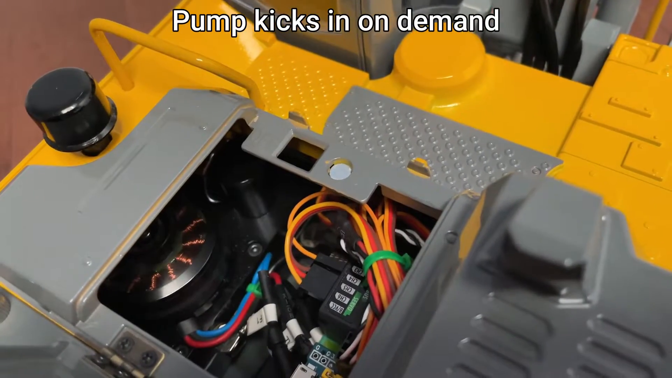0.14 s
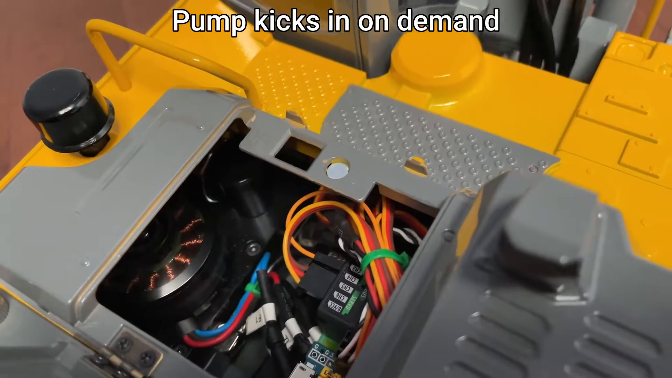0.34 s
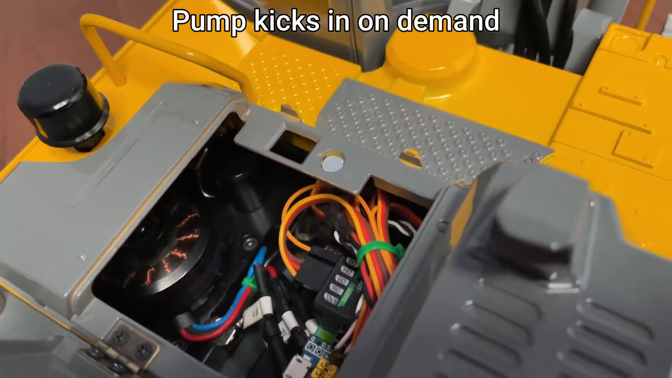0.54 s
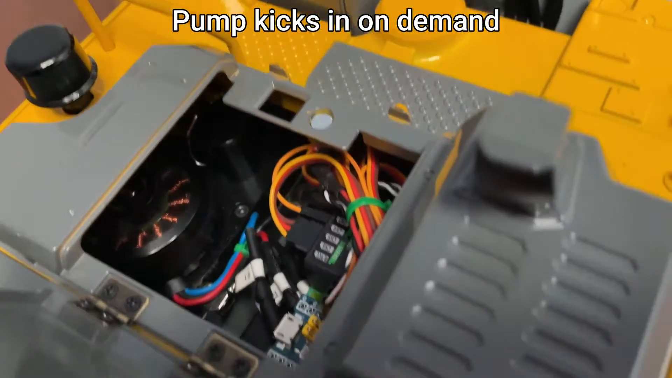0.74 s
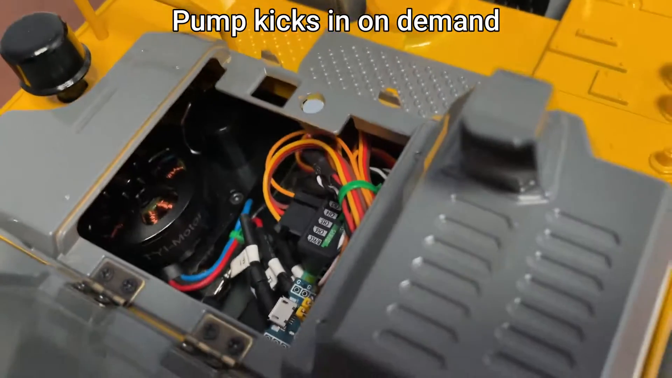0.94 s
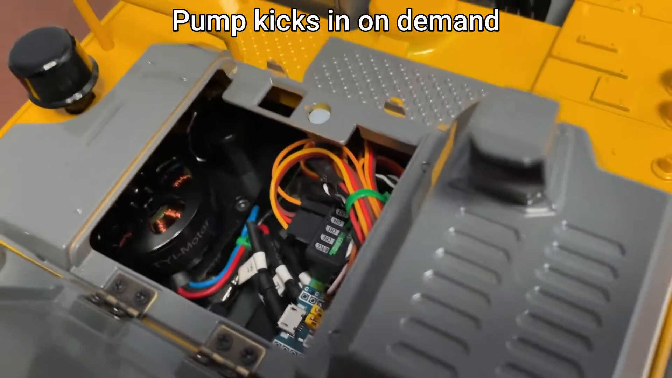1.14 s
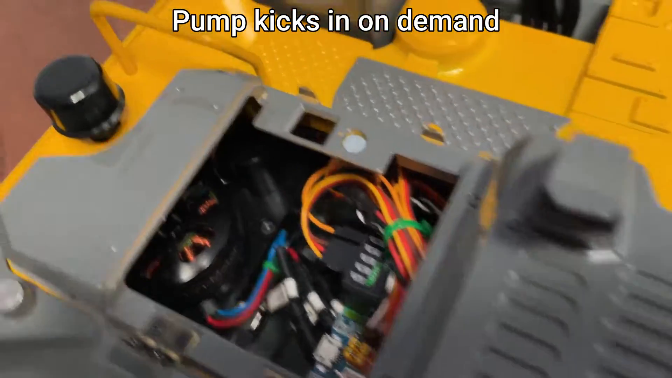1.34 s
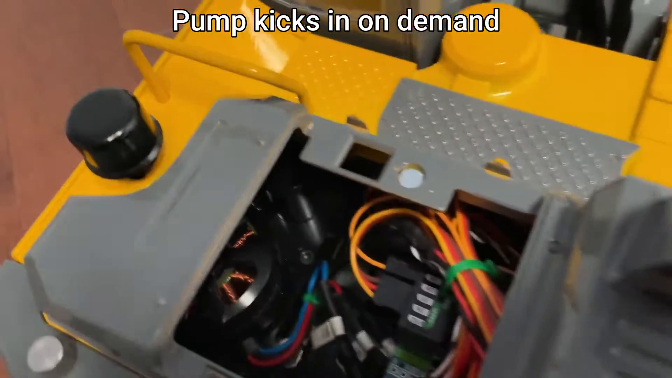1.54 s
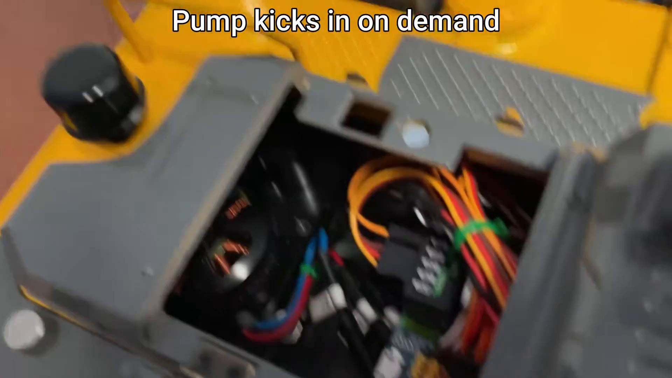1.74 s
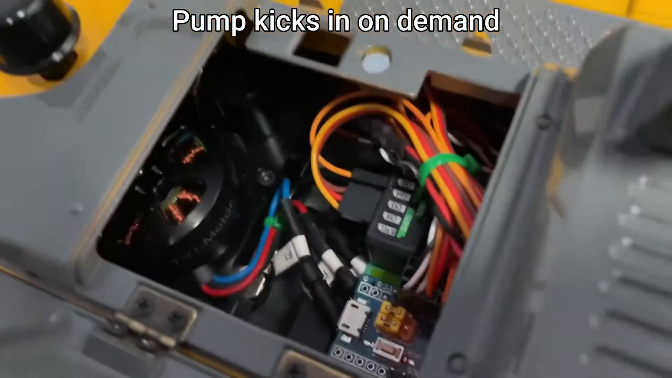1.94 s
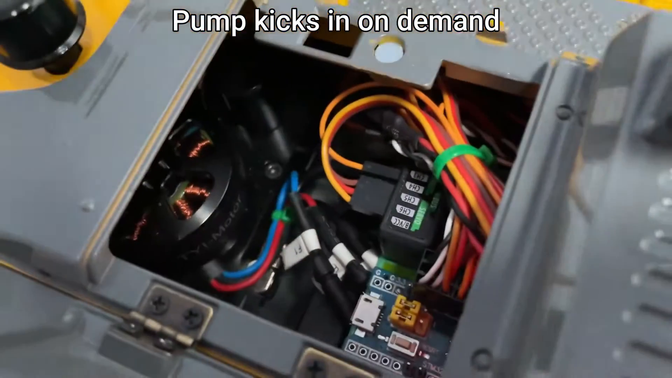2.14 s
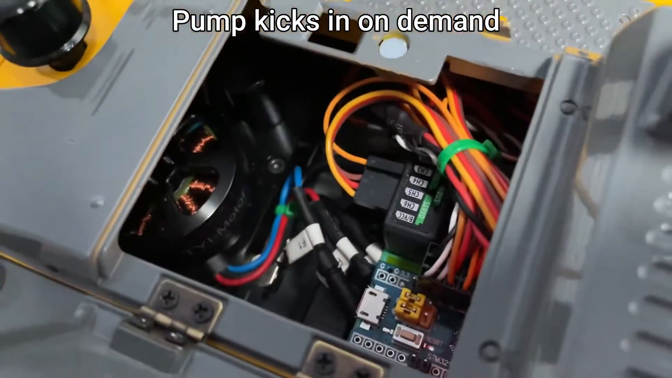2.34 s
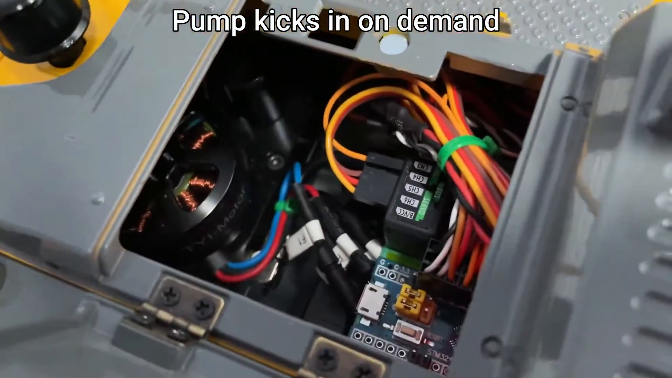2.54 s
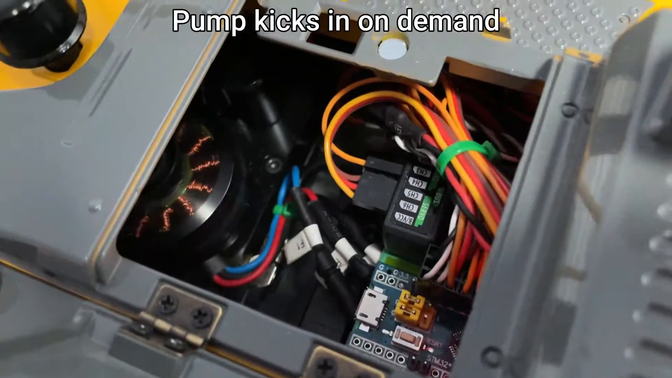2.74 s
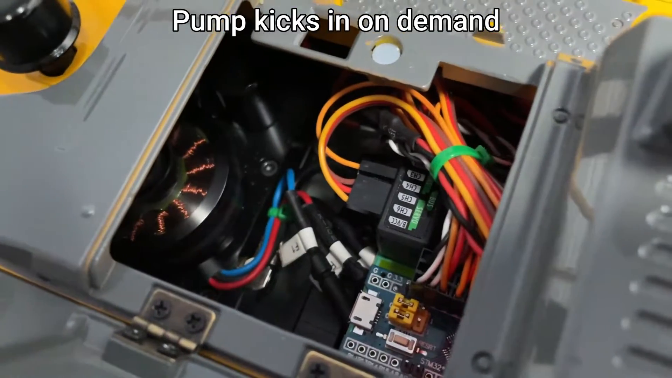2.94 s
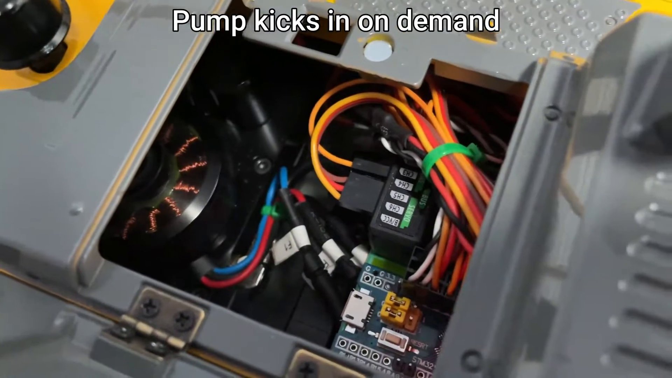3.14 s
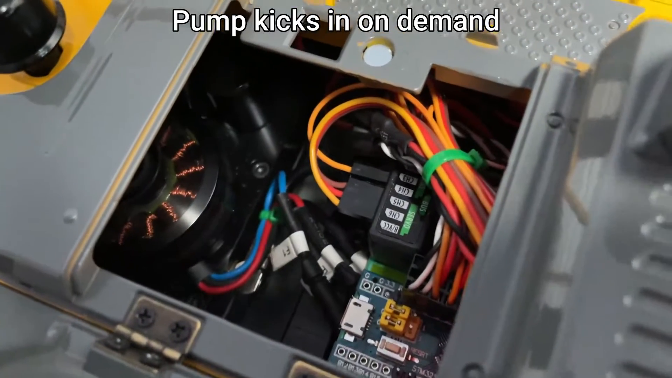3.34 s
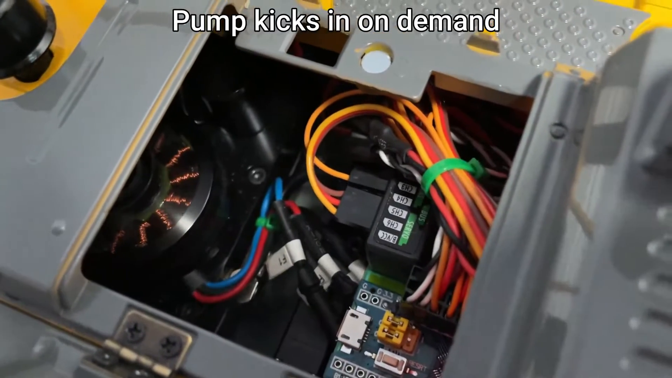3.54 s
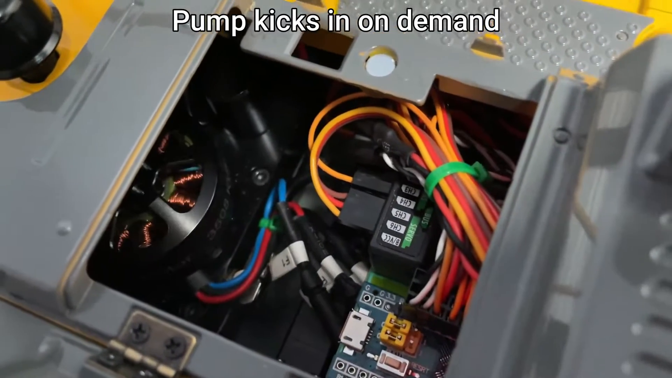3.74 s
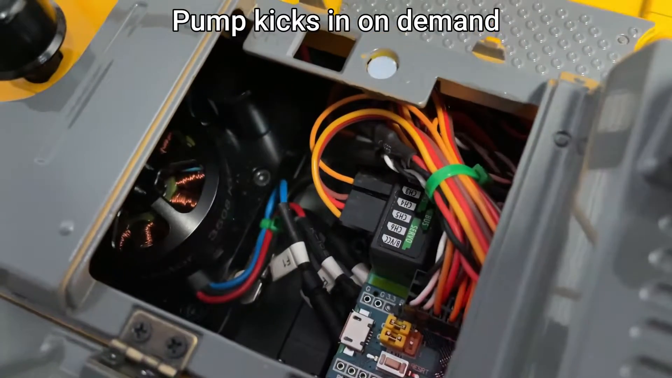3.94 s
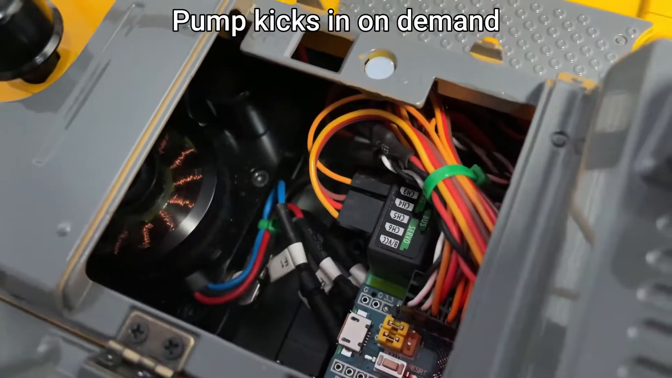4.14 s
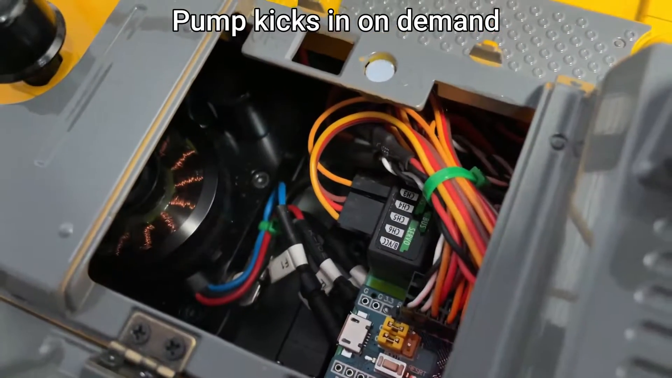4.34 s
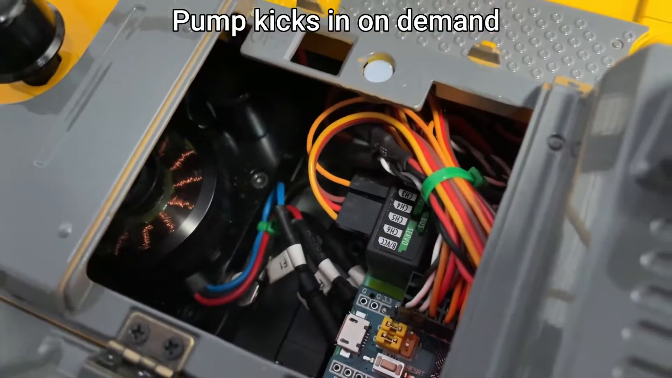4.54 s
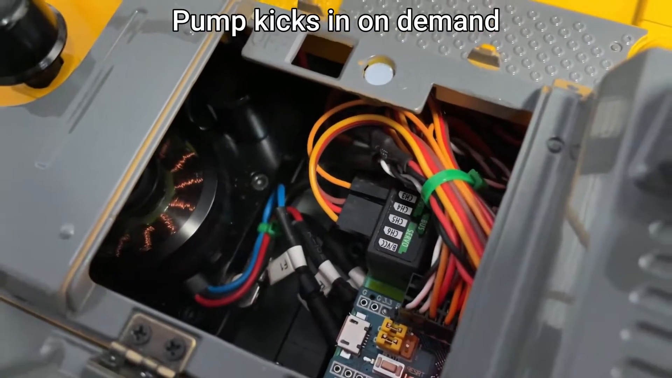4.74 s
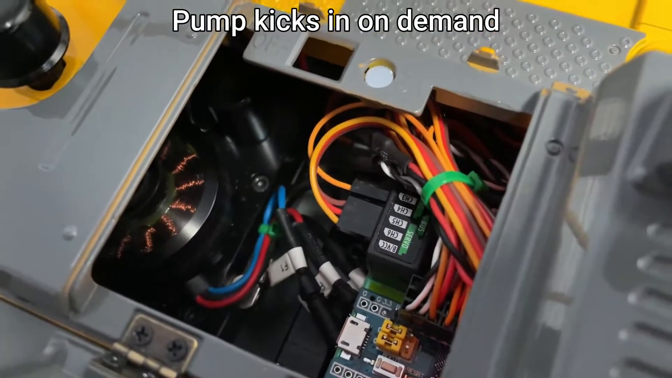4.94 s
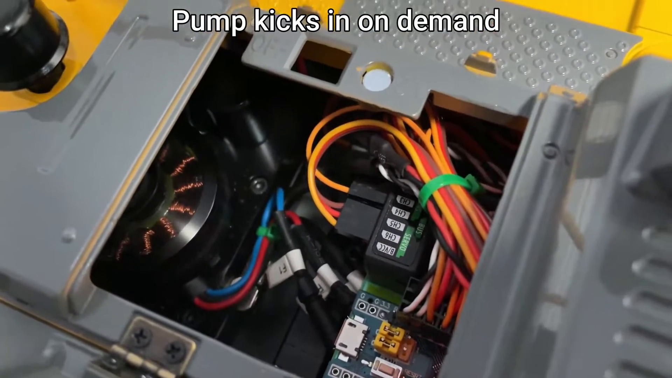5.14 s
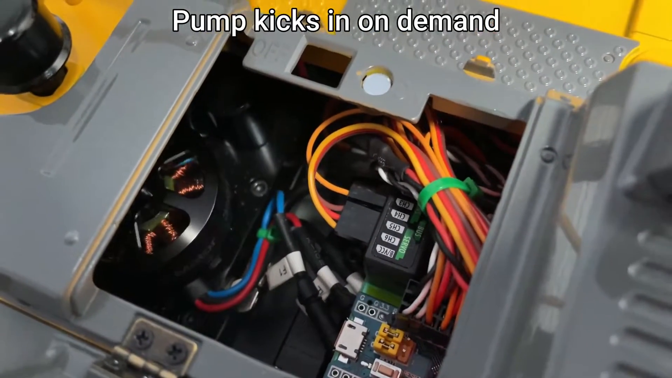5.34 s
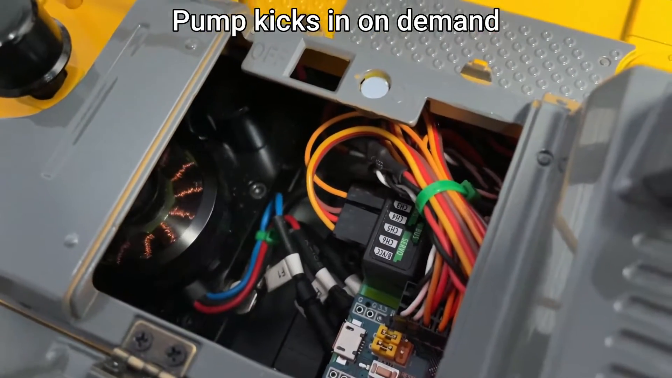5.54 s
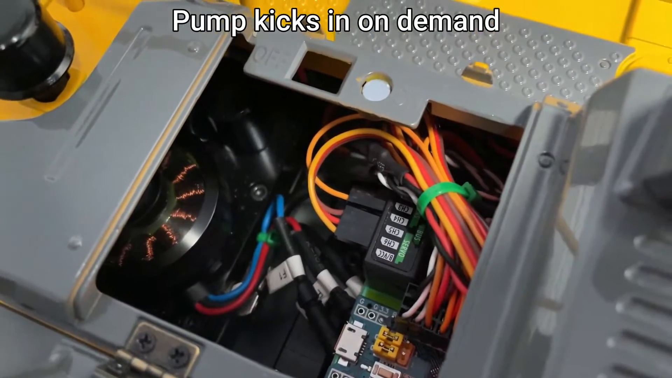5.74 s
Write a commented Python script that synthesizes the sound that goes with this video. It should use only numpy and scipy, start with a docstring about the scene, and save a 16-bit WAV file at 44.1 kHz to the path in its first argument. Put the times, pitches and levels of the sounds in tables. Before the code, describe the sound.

A close, dry, centred indoor sound of miniature machinery: gritty metallic pump whirr with plasticky body rattle, running in four bursts. Between them a small fan whines steadily over soft air noise. Short servo hisses, ticking metal knocks and soft low thumps mark the stops and starts. The third burst is the most strained, singing at a high pitch before dropping off; the last is cut while running. The microphone moves closer early on.

```python
"""Inside a scale-model excavator

A pump drive runs four times, under way at the start and at the end: noisy tooth contacts ring steel and
plastic modes, and shaft overtones whine under load. Servos hiss in short moves, and one creeps with a
chopped buzz. Short noise blows knock, and sagging low sines thump as the chassis rocks. Behind it all
a small fan whines: sine orders over coloured air noise and a low room rumble."""
import sys
import numpy as np
from scipy import signal
from scipy.fft import rfft, irfft, next_fast_len
from scipy.io import wavfile
from scipy.ndimage import uniform_filter1d, map_coordinates

SR = 44100
rng = np.random.default_rng(int(sys.argv[2]) if len(sys.argv) > 2 else 0)


def bounce(signal):
    """Save signal as a 16-bit WAV file at the path given by the first command-line argument."""
    frames = np.transpose(np.atleast_2d(signal))
    limited = np.clip(frames, -1, 1)
    pcm = np.round(limited * 32767).astype(np.int16)
    wavfile.write(sys.argv[1], SR, pcm)


N = 255006

# Levels within a table are relative unless its comment says otherwise.
# Pump runs: start t/s, stop t/s, starting surge level/dB before each part's own scaling
PUMP_RUNS = [(-.1, .811, 0), (2.724, 3.572, 10), (4.071, 5.25, 7), (5.523, 5.9, 7)]
# Oil pressure on the pump: t/s, level/dB
OIL_LOAD = [(0, -1), (.8, 0), (2.84, -5), (2.92, -1), (3.4, .4), (3.58, 0), (4.1, -2.5), (4.45, .8),
            (4.6, 4.5), (4.78, 7), (5.05, 5), (5.14, 3.5), (5.18, -2.5), (5.3, -4), (5.62, -4), (5.73, 3)]
# Pump shaft speed before its jitter: t/s, f/Hz (turns a second)
SHAFT_SPEED = [(0, 155), (.85, 175), (2.75, 200), (2.95, 158), (3.6, 170), (4.2, 146), (4.42, 212),
               (4.59, 228), (4.65, 268), (4.74, 290), (4.79, 297), (5.08, 295.6), (5.125, 279), (5.3, 260),
               (5.5, 165)]
# The microphone moves in: t/s, level/dB
NEARNESS = [(0, -4), (.9, -2), (1.1, -4), (1.45, -2), (1.9, 0), (3.7, 1), (5.78, 2)]
# Pump parts by name: base level/dB, dB per dB of load, of nearness, of surge,
# spin-up time constant/s, surge fade time constant/s, run-out t60/s
PUMP_PARTS = dict(ring=(-28.5, 1.1, .2, 1.3, .002, .03, .1), bracket=(-27, .95, 1.7, 1.2, .004, .03, .25),
              bell=(-22.3, .42, -.1, .7, .002, .015, .05), drum=(-32.5, 1.05, -.1, 1.9, .045, .1, .25),
              rasp=(-31, 1.25, .1, 1.5, .012, .09, .15), hiss=(-28, .5, .5, .7, .015, .15, .2),
              hum=(-56, .7, .9, .1, .02, .05, .5))
# Steel housing modes: f/Hz, width/Hz, level/dB
HOUSING_MODES = [(2835, 30, -15), (3452, 55, 0), (3965, 85, -2)]
# Bracket modes: f/Hz, width/Hz, level/dB
BRACKET_MODES = [(3622, 55, 0), (3740, 70, -9)]
# Modes of the motor's spinning cup: f/Hz, width/Hz, level/dB
BELL_MODES = [(5068, 40, 0), (4985, 80, -14)]
# Plastic body panel modes: f/Hz, width/Hz, level/dB
PANEL_MODES = [(488, 26, -19), (573.6, 42.7, 6), (724, 24, -1.5), (807, 51, 3), (888, 37, -9)]
# Boom of the frame: f/Hz, width/Hz, level/dB
CHASSIS_MODES = [(225, 70, 10)]
# Spectrum of the pump's rasp: f/Hz, level/dB per Hz
RASP_SPECTRUM = [(25, -50), (70, -30), (230, -22), (330, -40), (433, -14.5), (583, -2), (724, -0.5),
                 (824, -5.5), (1020, -10.5), (2030, -6), (2170, -3.5), (2500, -12), (3200, -10),
                 (4160, -33), (7040, -120)]
# Valve block modes: f/Hz, width/Hz, level/dB
VALVE_MODES = [(4430, 1500, -22.5), (5620, 120, -19), (7080, 120, -9), (7650, 150, -12), (8250, 180, -13),
               (8900, 400, -12), (9970, 390, -14), (10600, 310, -12.5), (11760, 200, -12.5),
               (12800, 220, 2.5), (13750, 250, -4), (14100, 220, -.6), (14750, 310, -5), (15560, 220, 5)]
# Whine overtones: multiple of shaft speed, level/dB on top of the whine level
WHINE_OVERTONES = [(4, -6.5), (5, -10), (6, -8.5), (7, -1)]
# Servo moves: start t/s (18 dB below full), length/s, full level/dB, rise/s per 18 dB, sag level/dB, servo
SERVO_MOVES = [(.72, .09, -30, .03, 3, "near"), (.81, .085, -22, .03, .5, "near"),
               (2.73, .2, -30, .005, 12, "far"), (3.5, .07, -34, .04, .5, "far"),
               (3.575, .145, -22.5, .008, 2, "far"), (3.885, .085, -21, .04, 1.5, "far"),
               (3.98, .07, -27, .015, 5, "far"), (4.066, .015, -23, .008, .5, "far"),
               (5.14, .08, -27, .03, .5, "near"), (5.225, .14, -21, .02, 4, "near"),
               (5.4, .12, -18.5, .04, 7, "near"), (5.525, .045, -22.5, .015, 2.1, "near")]
# Case modes of the near servo: f/Hz, width/Hz, level/dB
NEAR_CASE_MODES = [(2794, 150, -1.5), (3350, 83, -1), (4020, 1400, -11), (5350, 280, -.6),
                   (5830, 150, -1.5), (7710, 300, -8), (8900, 300, -2.5), (9350, 270, 2.5),
                   (10630, 190, -12), (11650, 400, 2), (12800, 300, -8), (13400, 400, -16),
                   (14400, 300, -5), (15150, 300, -1)]
# Case modes of the far servo: f/Hz, width/Hz, level/dB
FAR_CASE_MODES = [(3190, 590, -5), (4000, 350, -.4), (4700, 270, -3), (5390, 220, 2.5), (5850, 200, 1.2),
                  (6670, 300, -10.5), (7600, 220, -4), (8400, 260, -1), (8930, 440, -4), (9640, 550, -8),
                  (11050, 590, -5), (11950, 300, 1.5), (13000, 300, -6), (13700, 320, -5),
                  (14700, 500, -1.5)]
# Servo creeping against load: t/s, gear level/dB, buzz level/dB, before twitches and chopping
CREEP_LEVELS = [(2.21, -51, -57), (2.3, -47, -49), (2.49, -45, -47), (2.53, -41, -41), (2.724, -39, -39)]
# Twitches of that servo: t/s, level/dB over the strain, half width/s
CREEP_TWITCHES = [(2.222, 6, .008), (2.39, 14, .022), (2.612, 8, .014)]
# Gear modes of the creeping servo: f/Hz, width/Hz, level/dB
CREEP_GEAR_MODES = [(5600, 760, 0), (8600, 360, -2), (9050, 330, -1), (9800, 330, -6)]
# Buzz modes of the creeping servo: f/Hz, width/Hz, level/dB
CREEP_BUZZ_MODES = [(11500, 250, -2), (12200, 250, -1), (12850, 300, -1), (13600, 300, -6),
                    (14900, 500, -2), (15400, 150, -6)]
# Slack taken up: t/s, rattle level/dB into the modes, dull level/dB and crack level/dB relative to the rattle
SLACK_KNOCKS = [(0.8006, 2, -30, -28), (2.7252, 1, -13, -24), (2.7414, 1.5, -23, -22),
                (4.0587, .4, -14, -24), (4.0721, 6, -32, -23), (5.243, 3, -34, -24),
                (5.5233, 1.5, -24, -27)]
# Chassis jolts: t/s, level/dB before make-up gain, settled f/Hz, t60/s, pitch excess at the start (fraction)
CHASSIS_JOLTS = [(.838, -36, 130, 0.21, 0.57), (1.521, -41.5, 95, 0.15, 2.1), (2.748, -30, 100, 0.16, .3),
                 (4.07, -34.5, 96, 0.25, .5), (5.544, -38, 110, 0.17, 0.54), (5.738, -32, 85, 0.094, .6)]
# Faint fan lines that follow the air level: multiple of fan speed, level/dB
FAINT_FAN_LINES = [(1, -65), (3, -59), (4, -57), (5, -52), (8, -47), (10, -44.5), (15, -51.5), (16, -53),
                   (27, -78), (28, -86), (35, -48), (40, -56), (45, -69)]
# Loud fan lines: multiple of fan speed, level/dB, dB per dB of nearness,
# t/s when the microphone passes the loud spot, level/dB gained there
LOUD_FAN_LINES = [(20, -36, .5, 1.8, .6), (24, -41, 1.5, 1.9, 2.1), (25, -41, 2.1, 2.2, 4),
                  (30, -41, .1, 1.6, 4.5)]
# Spectrum of the fan's air rush: f/Hz, level/dB per Hz
AIR_SPECTRUM = [(180, -42), (300, -22.5), (510, -15.5), (680, -9.5), (852, -12.5), (1210, -8.5), (1680, 0),
                (3050, -11.5), (3480, -2.5), (3780, -6.5), (4170, -2), (5260, -4.5), (5530, -8.5),
                (11100, -26), (15700, -38)]
# Spectrum of the low room rumble: f/Hz, level/dB per Hz
ROOM_SPECTRUM = [(15, -63), (25, -25), (75, 6), (177, -7.5), (236, -0.5), (348, -21), (375, -71),
                 (500, -5.5), (650, 9), (1100, -120)]
# Duller body answer and broad crack of a knock: f/Hz, width/Hz, level/dB
DULL_MODES = [(1490, 130, 0), (2390, 340, 0)]
CRACK_MODES = [(11000, 9600, 0)]

WHINE_DB, WHINE_LOAD_DB = -29.5, 3.5  # base level, and the load that reaches it
WHINE_DROP = 6  # dB lost per dB of load below that
MOVE_SWING_DB, MOVE_STOP_S = 18, .035  # a servo move falls by the swing in this time
SERVO_PATCHY_DB = 1.8  # bands of a servo's hiss come and go by this much
BUZZ_HZ, CHOP_DEPTH = 395, .6  # mean drive pulse rate of the creeping servo, depth 0 to 1
FIRST_BLOW = 7  # first sample of a knock, against the unit noise that follows
FAN_HZ = 171.3  # mean turns a second
AIR_DB, ROOM_DB = -32, -55  # rms; the air is also moved by nearness
SPOT_S = .35  # half width of the passage through a loud spot
TOP_HZ = 15750  # band limit of the input stage


def pump():
    """Uneven tooth contacts shake housing, motor and body modes; the shaft hums unsteadily."""
    runout = wobble(45)  # gear run-out throbs, felt by each noisy part
    teeth = amp(0.41 * runout) * grit(300, lump_db=2.1)
    ring = strength("ring") * unit(rung(teeth, HOUSING_MODES))
    bracket = strength("bracket") * unit(rung(teeth, BRACKET_MODES))

    bell_noise = amp(0.21 * runout) * rng.standard_normal(N)
    bell = strength("bell") * shaken(bell_noise, BELL_MODES)

    panels = rung(amp(0.54 * runout) * grit(65, lump_db=.9), PANEL_MODES)
    # Small panels radiate no bass
    radiated = filtered(panels, lambda hz: 1 / (1 + (340 / (hz + 1)) ** 3))
    drum = strength("drum") * unit(radiated)

    rasp = strength("rasp") * coloured(amp(1.3 * runout) * grit(300, lump_db=1.5), RASP_SPECTRUM)
    hiss = strength("hiss") * shaken(amp(0.65 * runout) * grit(400, lump_db=1.5), VALVE_MODES)
    return ring + bracket + bell + drum + rasp + hiss + shaft_hum()


def shaft_hum():
    """The shaft's sine booms in the frame, and its octave sings where it meets a panel mode."""
    speed = curves(SHAFT_SPEED)[0]
    turn = 2 * np.pi * np.cumsum(speed * (1 + 0.03 * wobble(50))) / SR
    sway = 0.79 + 0.52 * wobble(35)  # the hum comes and goes
    level = strength("hum")
    shaft = level * np.sin(turn)
    octave = amp(14) * rung(level * np.sin(2 * turn), PANEL_MODES)
    return sway * (amp(-5) * shaft + rung(shaft, CHASSIS_MODES) + octave)


def strength(part):
    """A part spins up with a surge, follows load and nearness, and runs out."""
    db, by_load, by_near, by_surge, up_s, fade_s, out_s = PUMP_PARTS[part]
    t = np.arange(N) / SR
    load_db, near_db = curves(OIL_LOAD)[0], curves(NEARNESS)[0]
    running = 0
    for start, stop, surge_db in PUMP_RUNS:
        since = np.maximum(t - start, 0)
        surge = by_surge * surge_db * np.exp(-since / fade_s)
        run_out_db = -60 * np.maximum(t - stop, 0) / out_s
        running = running + (1 - np.exp(-since / up_s)) * amp(surge + run_out_db)
    return running * amp(db + by_load * load_db + by_near * near_db)


def whine():
    """Under full load, shaft overtones sing and throb about once per turn of the slower gear."""
    hz, load_db = curves(SHAFT_SPEED)[0], curves(OIL_LOAD)[0]
    db = WHINE_DB + WHINE_DROP * np.minimum(load_db - WHINE_LOAD_DB, 0)
    turn = 2 * np.pi * np.cumsum(hz * (1 + 0.005 * wobble(60))) / SR
    throb = 1 + .6 * np.cos(turn / 13)  # once per 13 shaft turns
    overtones = sum(amp(db + level + 2.5 * wobble(40)) * np.sin(k * turn) for k, level in WHINE_OVERTONES)
    return throb * overtones


def servos():
    """Tiny fast gears hiss in each servo case while it moves."""
    t, out = np.arange(N) / SR, np.zeros(N)
    for servo, case in (("near", NEAR_CASE_MODES), ("far", FAR_CASE_MODES)):
        level = np.zeros(N)
        for start, length, db, rise, sag_db, mover in SERVO_MOVES:
            if mover != servo:
                continue
            end = start + max(length, rise)
            times = [start - 2 * rise, start + rise, end, end + 3 * MOVE_STOP_S]
            shape_db = [-3 * MOVE_SWING_DB, 0, -sag_db, -sag_db - 3 * MOVE_SWING_DB]
            level += amp(db + np.interp(t, times, shape_db, left=-120, right=-120))
        hiss = shaken(grit(180, lump_db=1.2), case)
        out += level * patchy(hiss, depth_db=SERVO_PATCHY_DB)
    return out


def creep():
    """A straining servo chops its hiss at the drive rate and twitches now and then."""
    t = np.arange(N) / SR
    gear_db, buzz_db = curves(CREEP_LEVELS)
    begin, end = CREEP_LEVELS[0][0], CREEP_LEVELS[-1][0]
    gate = np.clip(np.minimum(t - begin, end - t) / .006, 0, 1)  # 6 ms fades
    twitch_db = sum(db * np.exp(-((t - s) / width) ** 2) for s, db, width in CREEP_TWITCHES)
    beat = np.cos(2 * np.pi * np.cumsum(BUZZ_HZ * (1 + .03 * wobble(30))) / SR)
    gear = amp(gear_db) * shaken(grit(180, lump_db=0.6), CREEP_GEAR_MODES)
    buzz = amp(buzz_db) * shaken(grit(200, lump_db=1.5), CREEP_BUZZ_MODES)
    return gate * amp(twitch_db) * (1 + CHOP_DEPTH * beat) * (gear + buzz)


def knocks():
    """Each knock is a short rattle into the steel modes, with a duller part and a crack."""
    t = np.arange(SR // 20) / SR
    steel, dull, crack = np.zeros((3, N + SR))
    for s, db, dull_db, crack_db in SLACK_KNOCKS:
        i = slice(round(s * SR), round(s * SR) + len(t))
        rattle = rng.standard_normal((3, len(t)))
        rattle[:, 0] = FIRST_BLOW
        steel[i] += amp(db - 60 * t / 0.02) * rattle[0]
        # The body answers a moment later
        dull[i] += amp(db + dull_db - 60 * t / 0.062) * (t > .005) * rattle[1]
        crack[i] += amp(db + crack_db - 60 * t / 0.0083) * rattle[2]
    steel_ring = amp(4) * rung(steel[:N], HOUSING_MODES + BRACKET_MODES + BELL_MODES[:1])
    dull_ring = amp(16.5) * rung(dull[:N], DULL_MODES)
    return steel_ring + dull_ring + rung(crack[:N], CRACK_MODES)


def thumps():
    """The chassis rocks on its tracks; pitch sags and the swing is uneven as the jolt settles."""
    out, t = np.zeros(N + SR), np.arange(SR // 2) / SR
    for s, db, hz, t60, excess in CHASSIS_JOLTS:
        turn = 2 * np.pi * hz * np.cumsum(1 + excess * np.exp(-t / .011)) / SR
        swell = 1 - np.exp(-t / 0.011)
        decay = amp(db + 6.5 - 60 * t / t60)  # 6.5 dB make-up for the soft swell
        out[round(s * SR):][:len(t)] += decay * swell * np.sin(turn)
    return out[:N] * amp(3.4 * wobble(60))


def fan():
    """Clean blade and magnet orders of the turning fan over its air rush, with the room below."""
    t, near_db = np.arange(N) / SR, curves(NEARNESS)[0]
    turn = 2 * np.pi * np.cumsum(FAN_HZ * (1 + 0.00046 * wobble(8.7))) / SR

    def line(k, db):
        """One unsteady sine at a multiple of the fan speed."""
        return amp(db + 0.98 * wobble(12)) * np.sin(k * turn + rng.uniform(0, 2 * np.pi))

    faint = amp(33) * sum(line(k, db) for k, db in FAINT_FAN_LINES)
    loud = np.zeros(N)
    for k, db, by_near, s, spot_db in LOUD_FAN_LINES:
        passing = np.exp(-((t - s) / SPOT_S) ** 2)
        loud += line(k, db + by_near * near_db + spot_db * passing)
    air = patchy(coloured(rng.standard_normal(N), AIR_SPECTRUM), depth_db=1.7)
    rumble = amp(ROOM_DB) * coloured(grit(4.05, lump_db=3), ROOM_SPECTRUM)
    return amp(AIR_DB + near_db) * (air + faint) + loud + rumble


def amp(db):
    """Decibels to linear gain."""
    return 10 ** (np.asarray(db) / 20)


def unit(x):
    """x scaled to rms 1."""
    return x / np.sqrt(np.mean(x ** 2) + 1e-20)


def curves(rows):
    """One value per sample for each column after the time."""
    s, *cols = np.transpose(rows)
    return [np.interp(np.arange(N) / SR, s, c) for c in cols]


def wobble(rate):
    """A smooth random curve, rate knots a second."""
    knots = rng.standard_normal(int(N * rate / SR) + 4)
    return map_coordinates(knots, [np.arange(N) * rate / SR])


def grit(rate, lump_db):
    """Noise whose strength comes in lumps, rate a second."""
    return amp(lump_db * wobble(rate)) * rng.standard_normal(N)


def filtered(x, response):
    """x times a complex response of frequency."""
    m = next_fast_len(N + SR // 2)  # padded so that tails do not wrap round
    return irfft(rfft(x, m) * response(np.fft.rfftfreq(m, 1 / SR)), m)[..., :N]


def coloured(x, points):
    """x through (f/Hz, level/dB) points on a log axis, rms 1."""
    f, db = np.transpose(points)
    return unit(filtered(x, lambda hz: amp(np.interp(np.log(hz + 1), np.log(f + 1), db))))


def rung(x, modes):
    """x through resonances driven together, with alternating signs."""
    def response(f):
        return sum((-1) ** k * amp(db) * 1j * f * w / (c * c - f * f + 1j * f * w)
                   for k, (c, w, db) in enumerate(modes))
    return filtered(x, response)


def shaken(x, modes):
    """Noise in resonances shaken at different places, so their powers add; rms 1."""
    def response(f):
        return np.sqrt(sum(amp(2 * db) * (f * w) ** 2 / ((c * c - f * f) ** 2 + (f * w) ** 2)
                           for c, w, db in modes))
    return unit(filtered(x, response))


def patchy(x, depth_db):
    """Bands of the noise swell and fade on their own; rms 1."""
    z = signal.stft(x, nperseg=512)[2]
    across_bands = uniform_filter1d(rng.standard_normal(z.shape), 5, 0)
    field = uniform_filter1d(across_bands, 6, 1)  # smoothed along time too
    return unit(signal.istft(z * amp(depth_db * unit(field)), nperseg=512)[1][:N])


def scene():
    """All sources summed at one microphone, the same in both channels."""
    machine = pump() + whine() + servos() + creep() + knocks() + thumps()
    return np.tile(machine + fan(), (2, 1))


def record(dry):
    """The input stage rounds off the highest peaks and keeps nothing above its band limit."""
    rounded = dry / (1 + np.abs(dry / .95) ** 4) ** (1 / 4)
    return filtered(rounded, lambda hz: hz < TOP_HZ)


dry = scene()
out = record(dry)
bounce(out)
```